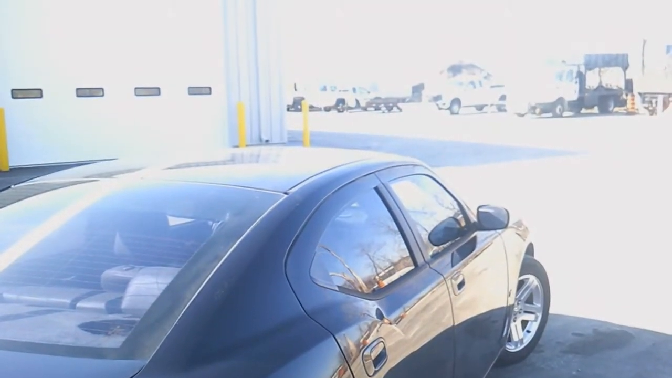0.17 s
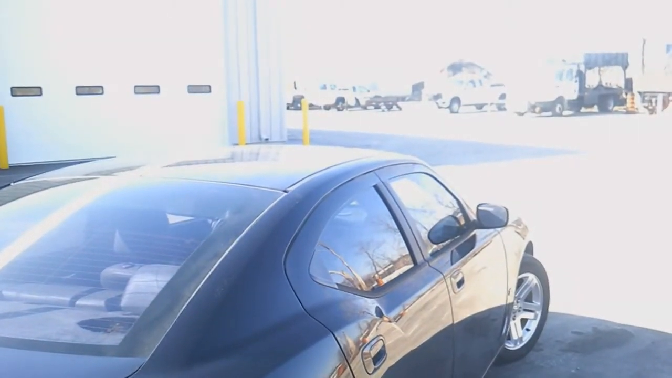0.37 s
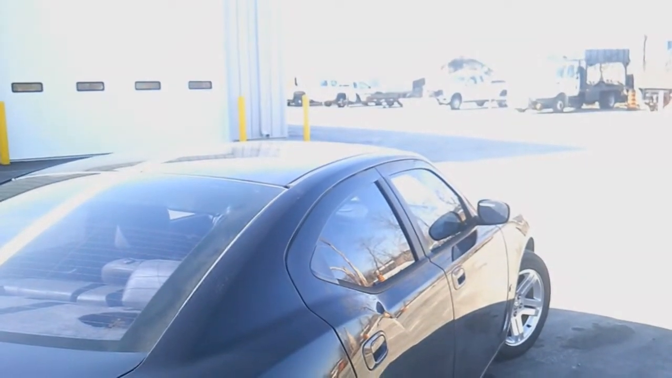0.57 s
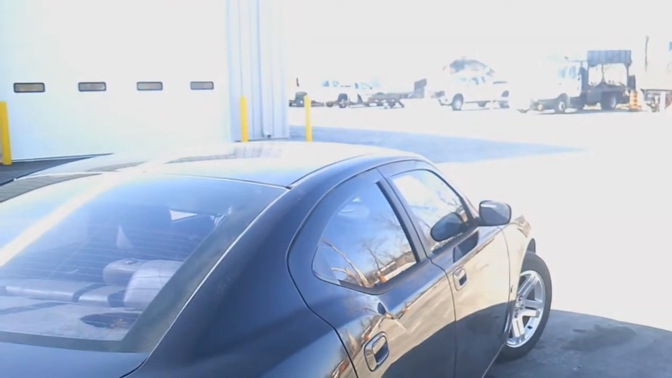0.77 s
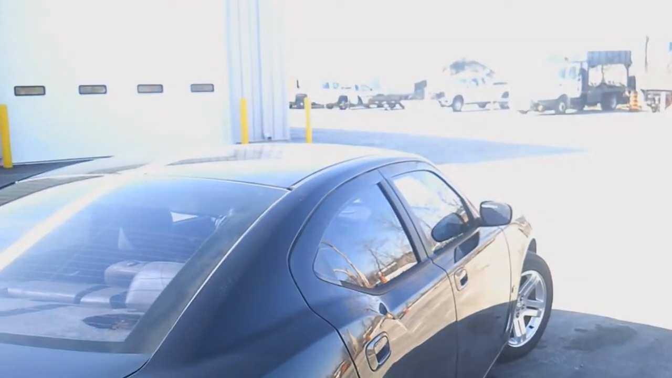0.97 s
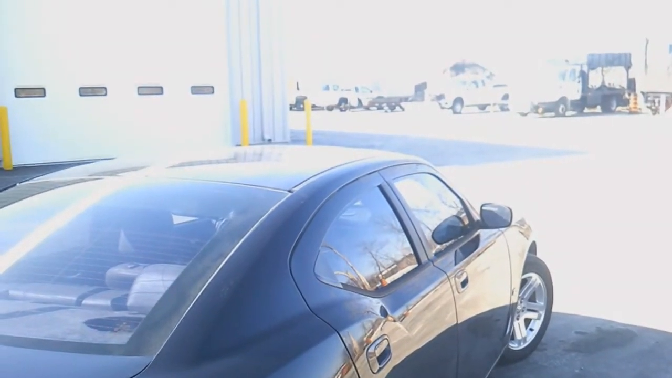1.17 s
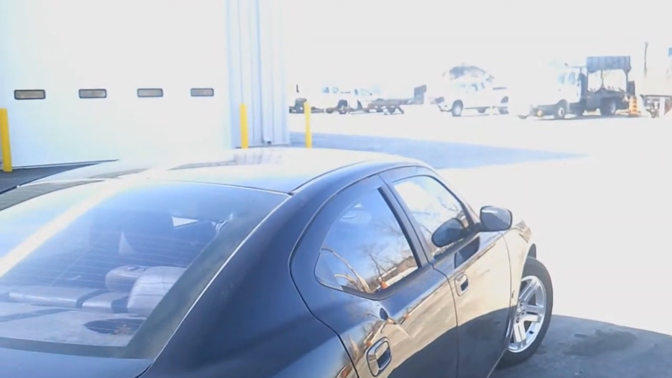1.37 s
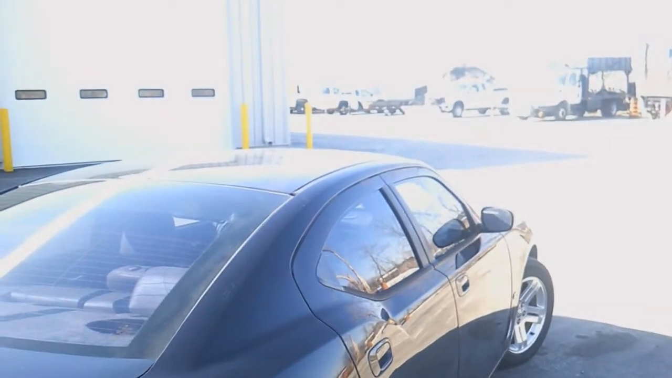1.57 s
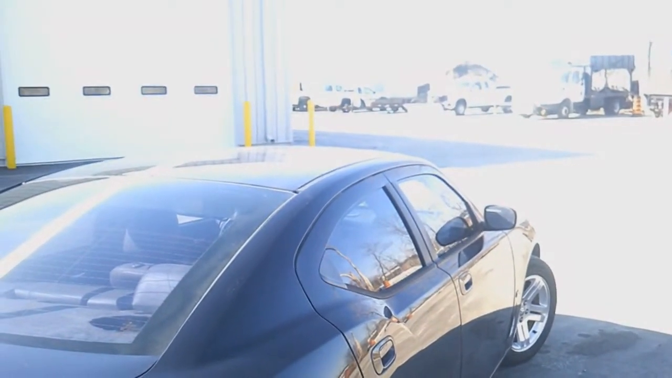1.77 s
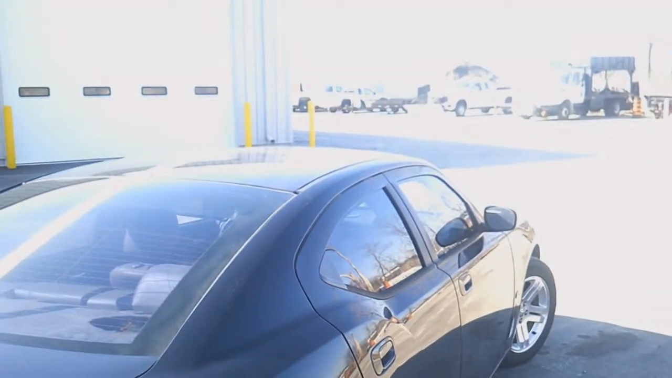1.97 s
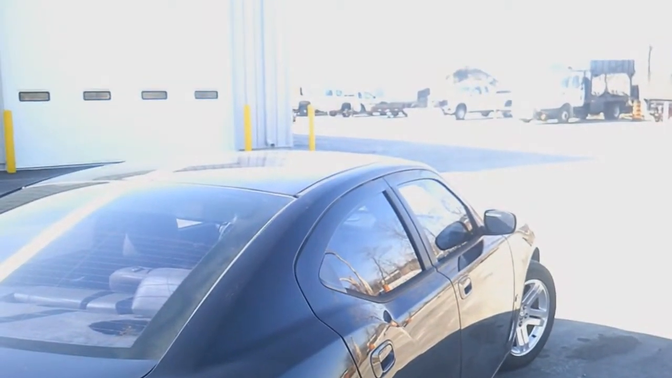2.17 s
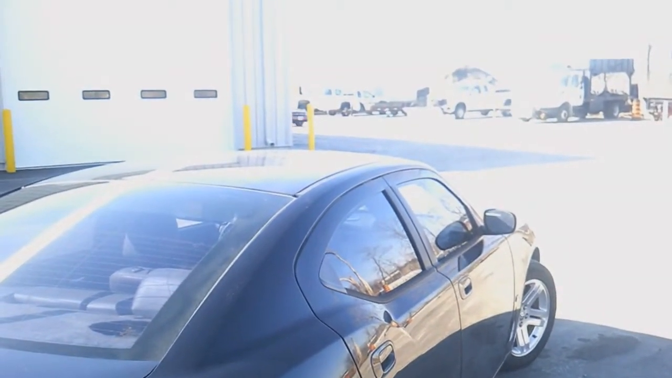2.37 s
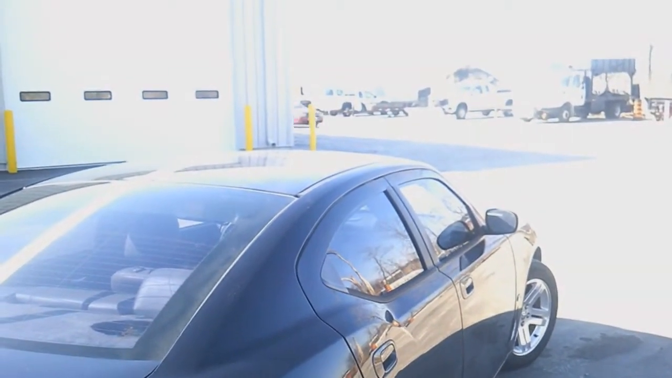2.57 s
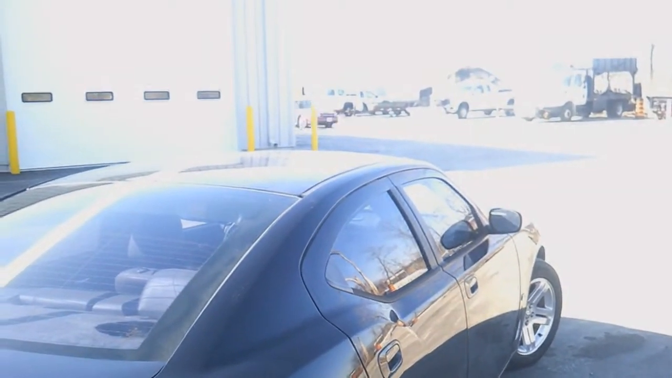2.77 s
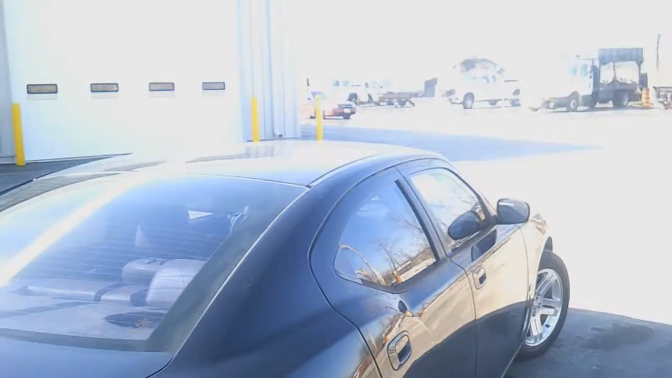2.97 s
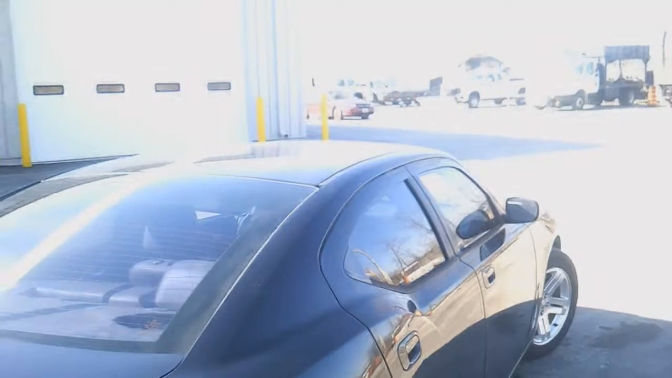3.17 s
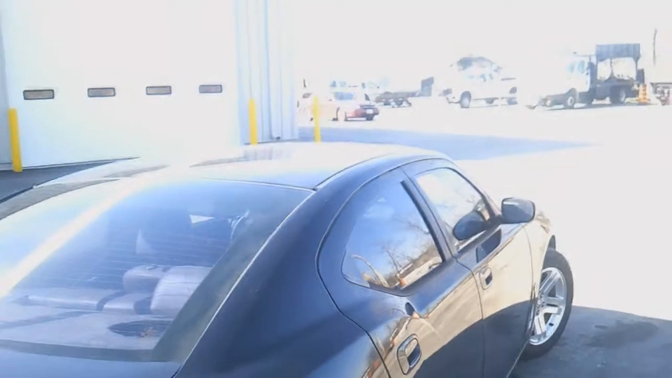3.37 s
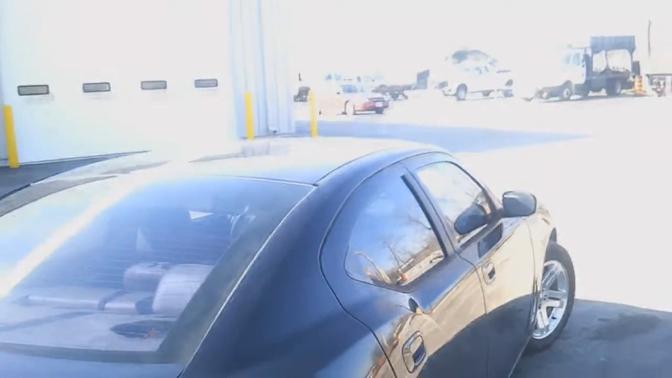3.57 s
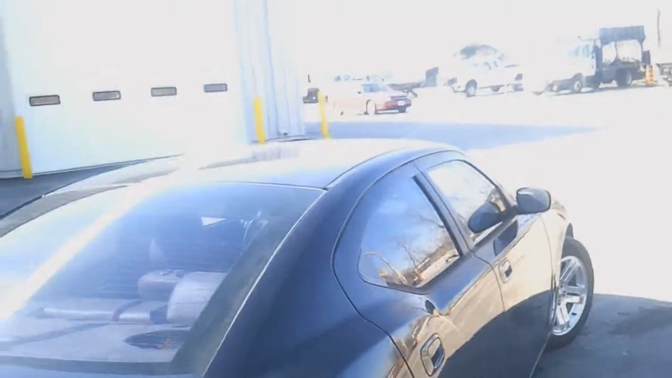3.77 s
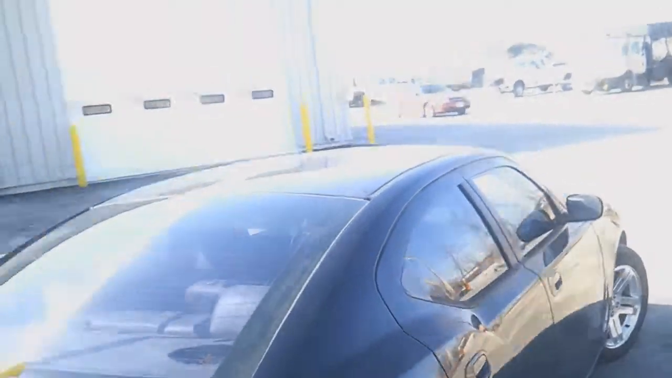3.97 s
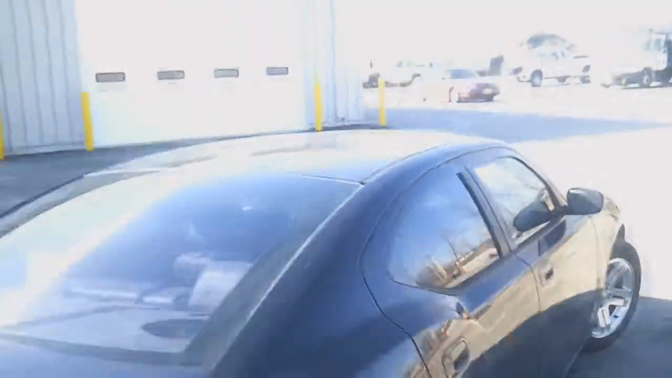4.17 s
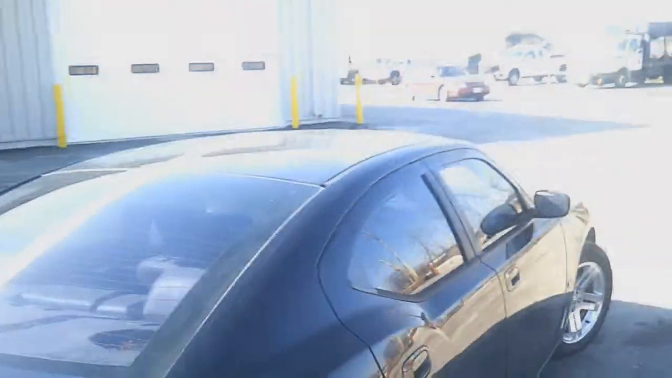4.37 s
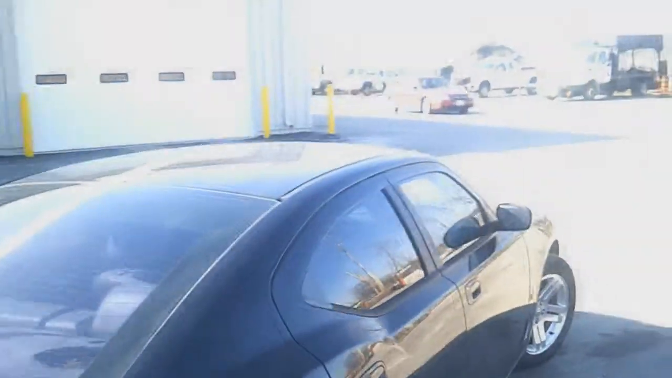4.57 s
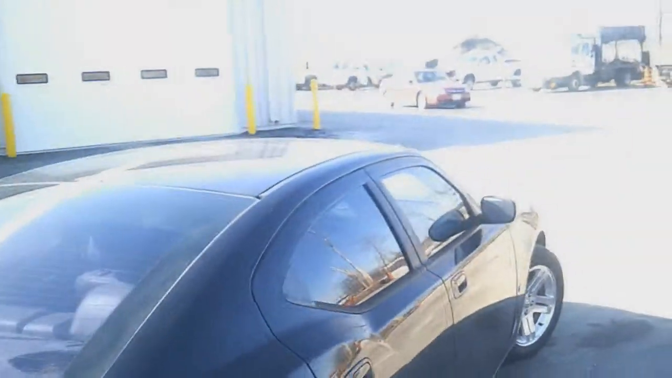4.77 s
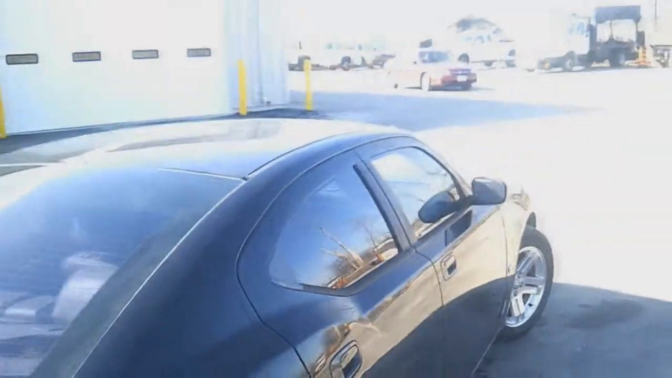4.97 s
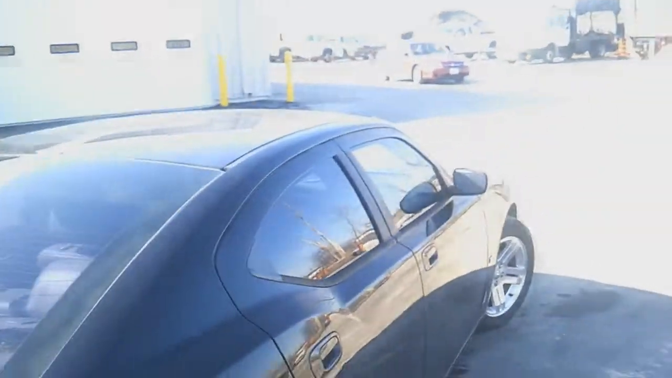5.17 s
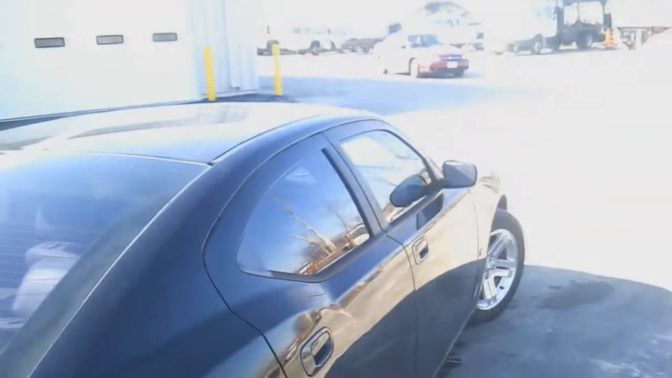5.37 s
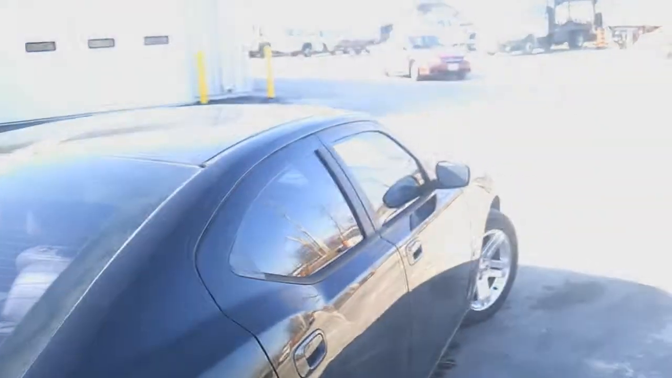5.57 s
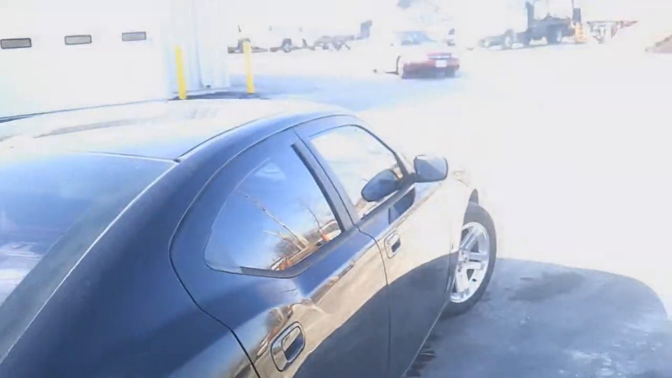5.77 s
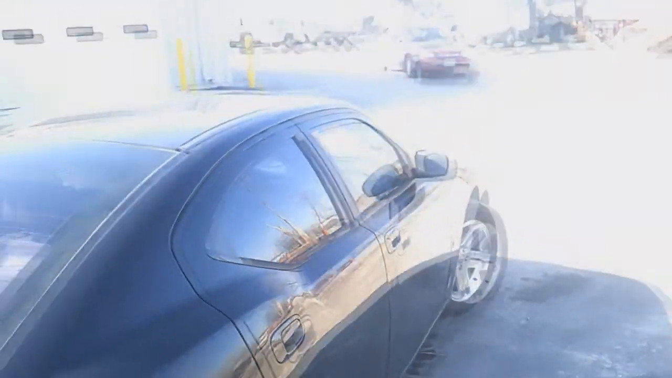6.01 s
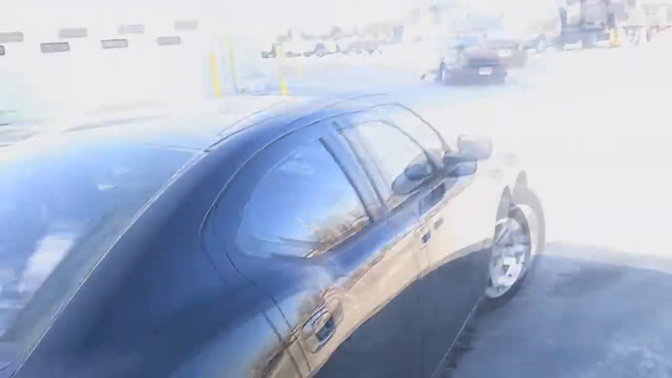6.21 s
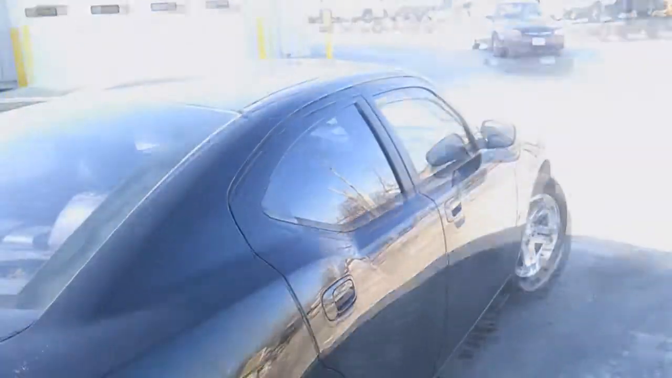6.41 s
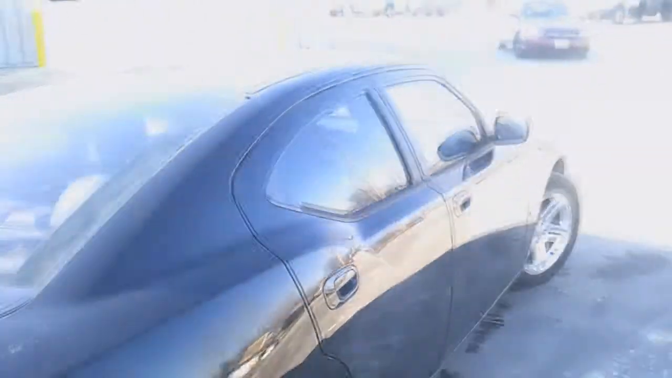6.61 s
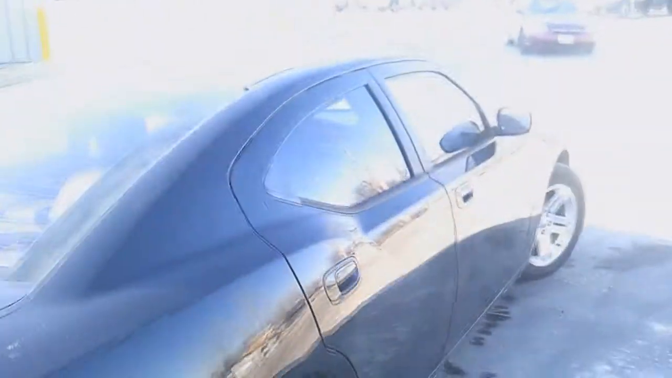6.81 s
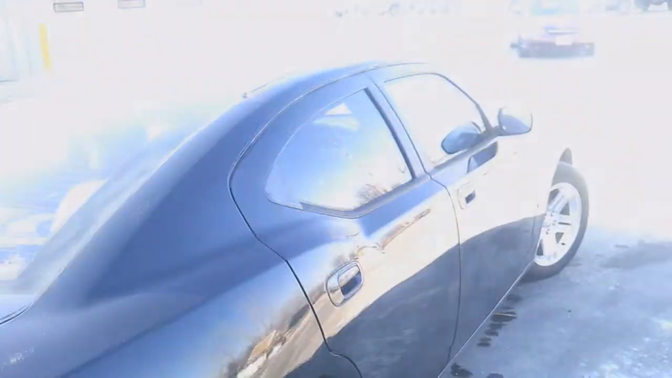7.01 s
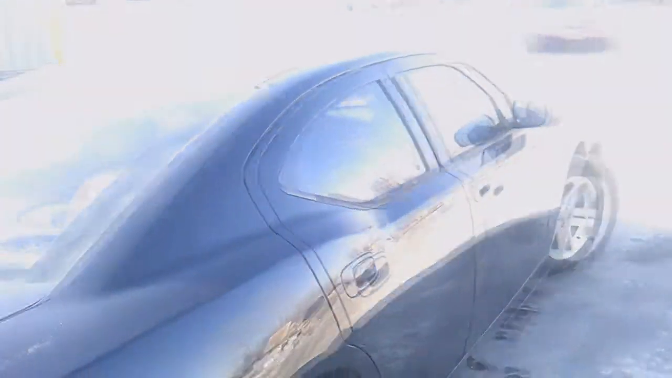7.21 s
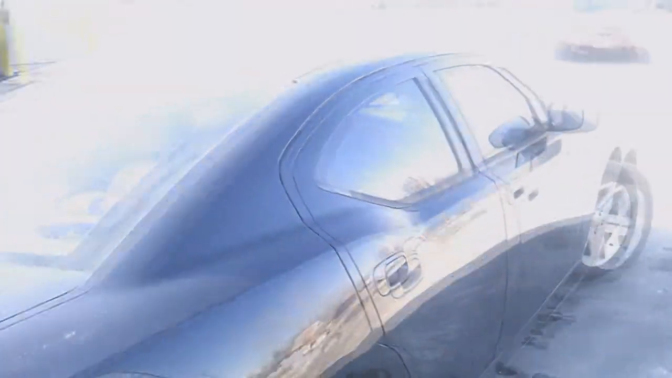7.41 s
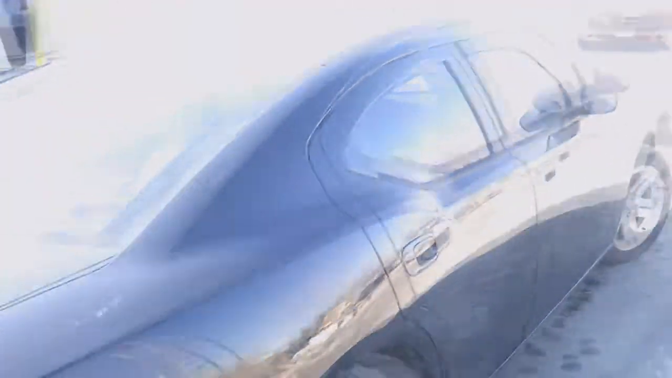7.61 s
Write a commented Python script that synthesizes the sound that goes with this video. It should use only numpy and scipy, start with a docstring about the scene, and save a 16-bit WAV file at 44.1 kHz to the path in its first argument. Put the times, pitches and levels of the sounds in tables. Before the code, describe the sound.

A car engine idles with a low hum as a car rolls slowly closer, while wind buffets the microphone.

```python
"""An open parking lot: a car engine idles fast, sagging and recovering, as a car rolls slowly closer.
The engine hums at multiples of its turning speed and booms when its exhaust pipe rings along.
Fans and belts whirr, tyres hiss and snap grit, and the other car drones briefly as it turns in.
Gusts buffet a small camera's microphone and, when strongest, make it pop.
The camera passes little above 3 kHz."""
import sys
import numpy as np
from scipy import signal
from scipy.fft import rfft, irfft, next_fast_len
from scipy.io import wavfile
from scipy.ndimage import uniform_filter1d

SR = 44100
rng = np.random.default_rng(int(sys.argv[2]) if len(sys.argv) > 2 else 0)


def transcribe(signal):
    """Save signal, clipped to [-1, 1], as a 16-bit WAV file at the path in sys.argv[1]."""
    frames = np.atleast_2d(signal).T
    limited = np.clip(frames, -1, 1)
    pcm = np.round(limited * 32767).astype(np.int16)
    wavfile.write(sys.argv[1], SR, pcm)


N = 337365
TIME = np.arange(N) / SR

# The engine's tones. Each row: multiple of the turning speed, relative level in dB, change under load in dB.
ENGINE_TONES = [(2, -10, 4.5), (3, -4.5, 0), (3.5, -9, 2.5), (4, 0.1, -1.5), (4.5, -22.5, 1.5),
                (5, -23, 1.5), (6, -19.5, -7), (6.5, -10.5, -5.5), (8, -20, 7.5), (10, -22, -3)]
# How fast the engine turns. Each row: time in seconds, turns per second.
ENGINE_SPEED = [(0, 31), (1, 30.67), (1.8, 30.38), (2.3, 29.43), (2.9, 29.04), (3.4, 29.39), (4, 29.47),
                (4.4, 30.17), (4.8, 30.78), (5.5, 30.96), (6.5, 30.57), (7, 30.42), (7.4, 29.78),
                (7.65, 30)]
# When the engine works harder. Each row: start in seconds, end in seconds.
LOAD_SPANS = [(2.13, 4.34), (7.12, 8.5)]
# The whine of a part the engine drives. Each row: time in seconds, pitch in Hz, level in dB.
ACCESSORY_WHINE = [(0, 2590, -65.5), (1.3, 2545, -70.5), (1.9, 2540, -61), (2.4, 2572, -58), (3, 2570, -62),
                   (3.4, 2595, -61.5), (4, 2600, -59), (4.35, 2580, -59), (4.6, 2535, -59),
                   (5.1, 2548, -66), (5.7, 2535, -61.5), (6.4, 2535, -65.5), (7.05, 2530, -70),
                   (7.3, 2520, -60), (7.65, 2550, -60)]
# Fans and belts. Each row: start and end in seconds, pitch in Hz, width in Hz, level in dB.
FAN_WHIRRS = [(0.4, 1.5, 1448, 16, -61), (1.5, 0.68, 1165, 22, -64), (0.3, 1.3, 1765, 25, -65),
              (0.4, 1.6, 2738, 24, -61.5), (0, 2.5, 580, 70, -62), (4.5, 8.4, 1380, 65, -58),
              (-1.5, 11, 2560, 170, -67), (7, 8.4, 2570, 140, -63)]
# Hiss of tyres and surroundings. Each row: frequency in Hz, relative dB with the car far, then near.
TYRE_COLOUR = [(58, 6, 9.5), (133, 14.5, 15.5), (167, -2, -1), (260, 5, 7.5), (363, 0.5, -1.5),
               (437, -1.5, -4.5), (515, 3, 2.5), (890, 1.5, 2), (1220, 0.5, -1), (1720, 0.5, 1),
               (2140, -1, 0), (2850, -4, -4), (4000, -2.5, -3.5)]
# The breeze on the microphone. Each row: time in seconds, then swell, rumble and flutter levels in dB.
BREEZE = [(0, -29, -40.5, -64.5), (1.4, -36.5, -41.5, -53.5), (2.2, -32, -43, -54.5),
          (3.05, -26, -41.5, -59), (3.55, -20, -40, -56), (4.4, -17.5, -39, -48), (4.8, -25.5, -44.5, -43),
          (5.4, -27, -40.5, -42), (5.9, -18, -39, -45), (6.45, -14, -40.5, -49.5), (6.85, -28.5, -35, -49),
          (7.25, -28.5, -33.5, -44), (7.65, -20.5, -36.5, -47)]
# Single shoves of wind. Each row: time and spread in seconds, thump in dB, thump in Hz, flutter in dB.
WIND_BUFFETS = [(.45, .035, -38, 40, -58), (0.806, 0.032, -36, 26, -54), (0.945, .07, -42, 77, -47),
                (1.83, 0.045, -37, 24, -57), (2.321, 0.036, -43, 25, -63), (2.602, .045, -33.5, 25, -63),
                (3.255, 0.054, -41.5, 28, -47), (3.508, 0.044, -36, 26, -61),
                (3.693, 0.042, -29.5, 20.3, -56.5), (3.85, 0.029, -23, 19.6, -65),
                (4.03, .04, -30.5, 21, -58), (4.275, 0.048, -28, 23, -46), (4.415, 0.024, -35, 52, -56),
                (4.54, 0.047, -29.5, 28, -49), (4.738, 0.018, -32.5, 55, -50), (4.82, .05, -40, 120, -43.5),
                (4.9, .03, -30.5, 33, -55), (5.13, .04, -23, 13.7, -58), (5.23, .05, -28, 24, -63),
                (5.585, 0.049, -20, 25, -33.5), (6.015, .04, -28, 16, -61), (6.55, .03, -34, 32, -37.5),
                (6.697, 0.021, -31, 48, -28.5), (6.755, 0.015, -39.5, 37, -35.5),
                (6.934, 0.015, -30.5, 77, -49), (7.18, 0.043, -33, 30, -51)]
# Grit on the asphalt. Each row: start in seconds, peak in dB, pitch in Hz, fade time in seconds.
GRIT_SNAPS = [(1.238, -43, 3750, 0.024), (2.717, -37.5, 2900, 0.008), (3.6, -46, 3750, 0.032),
              (3.892, -40, 4100, 0.012), (4.003, -39.5, 1500, 0.015), (6.251, -34, 1050, 0.005),
              (6.48, -34.5, 4100, 0.018), (6.523, -36, 1430, 0.007), (6.541, -38, 1370, 0.004)]
# Faint, bright scuffs. Each row: time in seconds, spread in seconds, level in dB.
BRIGHT_SCUFFS = [(1.255, 0.018, -51), (6.265, 0.071, -44.5), (6.488, 0.046, -40.5)]
# The other car's engine tones. Each row: multiple of its base pitch, relative level in dB.
FAR_CAR_TONES = [(2.5, -2), (3, 1.5), (3.5, -5.5), (5, -3.5), (6, 0.5), (8.5, -6.5), (9, -1), (10, -1),
                 (12, -5)]
# Pops of wind. Each row: time in seconds, level in dB, pitch in Hz.
WIND_POPS = [(4.695, -35, 360), (4.805, -30, 260), (5.003, -30, 245), (5.074, -36, 295),
             (5.085, -31.5, 330), (5.321, -33.5, 278), (5.399, -30, 376), (5.421, -26, 230),
             (5.526, -24, 440), (5.582, -36, 315), (5.607, -19, 159), (5.623, -24.5, 288),
             (5.643, -28.5, 296), (5.66, -23.5, 317), (5.72, -31, 260), (5.756, -36, 450),
             (5.802, -30, 240), (6.042, -41, 290), (6.136, -27, 530), (6.254, -31, 750), (6.541, -23, 380),
             (6.6825, -20, 201), (6.69, -23, 240), (6.695, -25, 400), (6.7087, -16.5, 310),
             (6.729, -24, 350), (6.875, -39, 380), (7.045, -33, 400)]
# What the camera lets through. Each row: frequency in Hz, gain in dB.
CAMERA_RESPONSE = [(2600, 0.5), (2850, -2.5), (3100, -9), (3400, -18), (3800, -25), (4400, -29.5),
                   (5000, -37), (6000, -39), (7200, -33.5), (8000, -38.5), (9000, -62)]
# The camera's own hiss. Each row: frequency in Hz, relative level in dB.
CAMERA_HISS = [(3000, -7), (5200, -13), (6300, -2.5), (7200, -0.5), (7900, -3), (8700, -21.5),
               (15000, -30.5)]


def undb(db):
    """Turn decibels into a number to multiply by."""
    return 10 ** (np.asarray(db) / 20)


def unit(x):
    """Scale a sound to an average strength (rms) of 1."""
    return x / np.sqrt(np.mean(x ** 2))


def curves(table):
    """Join timed rows with straight lines, giving one curve for each column after the time."""
    times, *columns = np.transpose(table)
    return [np.interp(TIME, times, column) for column in columns]


def colour(x, points):
    """Make some frequencies louder and others softer, following (Hz, dB) points."""
    hz, db = np.transpose(points)
    size = next_fast_len(N + SR // 2, True)
    bins_hz = np.maximum(np.fft.rfftfreq(size, 1 / SR), .5)
    gain = undb(np.interp(np.log(bins_hz), np.log(hz), db))
    padded = np.r_[x, np.linspace(x[-1], x[0], size - N)]
    return irfft(rfft(padded) * gain, size)[:N]


def noise(points):
    """Noise of strength 1, shaped by (Hz, dB) points."""
    return unit(colour(np.pad(rng.standard_normal(N - 2), 1), points))


def resonate(x, hz, width_hz):
    """Keep a narrow band around one pitch, so that it rings."""
    return signal.lfilter(*signal.iirpeak(hz, hz / width_hz, fs=SR), x)


def walk(rate):
    """A smooth random wobble of size about 1, with `rate` new values a second."""
    hold = int(SR / rate)
    steps = rng.standard_normal(2048)[np.arange(N) // hold % 2048]
    return 1.3 * uniform_filter1d(uniform_filter1d(steps, hold), hold)


def bell(at_s, spread_s):
    """A smooth rise and fall: 1 at the given time, about 0.6 one spread to either side."""
    return np.exp(-.5 * ((TIME - at_s) / spread_s) ** 2)


def rough_tone(hz, width_hz):
    """A tone of strength 1, its pitch smeared over the given width."""
    jitter = rng.standard_normal(N) + 1j * rng.standard_normal(N)
    drift = signal.lfilter([1], [1, -np.exp(-np.pi * width_hz / SR)], jitter)
    turns = np.cumsum(hz * np.ones(N)) / SR
    return unit((drift * np.exp(2j * np.pi * turns)).real)


def engine(idle_hz=31, idle_db=-42.5, sag_db_per_hz=3, load_ramp_s=0.63, stumble_rad=0.9):
    """Firings make a hum that weakens as the speed sags and gets lumpier under load."""
    turn_hz, = curves(ENGINE_SPEED)
    load = sum(np.clip(.5 + np.minimum(TIME - start, end - TIME) / load_ramp_s, 0, 1)
               for start, end in LOAD_SPANS)
    firing_db = idle_db - sag_db_per_hz * (idle_hz - turn_hz)
    angle = 2 * np.pi * np.cumsum(turn_hz * (1 + 0.003 * walk(12))) / SR
    lope_db = 0.7 * walk(11)  # all tones swell and dip together
    hum = 0
    for multiple, db, load_db in ENGINE_TONES:  # half steps: a four-stroke repeats every two turns
        lumps_db = (1.48 + 0.9 * load) * walk(16)
        stumble = stumble_rad * load * walk(28)  # uneven timing of the firings
        tone = np.sin(multiple * angle + stumble + 2 * np.pi * rng.random())
        hum += undb(db + load_db * load + lumps_db + lope_db) * tone
    return np.sqrt(2) * hum * undb(firing_db) + exhaust(turn_hz, angle, load)


def exhaust(turn_hz, angle, load, multiple=7, pipe_hz=204, width_hz=17, boom_db=-47.5, gas_db=-48):
    """The pipe booms as one engine tone sags onto its own pitch; flowing gas also makes it ring."""
    in_tune = 1 / np.hypot(1, (multiple * turn_hz - pipe_hz) / width_hz)
    # No two firings push the pipe alike, so timing and level waver.
    boom = in_tune * np.sin(multiple * angle + 0.28 * walk(45)) * undb(0.2 * walk(45))
    boom *= np.sqrt(2) * undb(boom_db + 6.5 * load)
    gas = resonate(rng.standard_normal(N), pipe_hz, 1.5 * width_hz)
    gas = unit(resonate(gas, pipe_hz, 1.5 * width_hz))
    return boom + gas * undb(gas_db - 6 * in_tune ** 2)  # the uneven ring gives way to the firm boom


def engine_bay(fade_s=0.51, wander=0.004):
    """A driven part whines, gliding a little; the whirrs of fans and belts wander, come and go."""
    whine_hz, whine_db = curves(ACCESSORY_WHINE)
    out = undb(whine_db) * rough_tone(whine_hz, width_hz=34)
    for start, end, hz, width_hz, db in FAN_WHIRRS:
        presence = np.clip(1 + np.minimum(TIME - start, end - TIME) / fade_s, 0, 1)
        out += undb(db) * presence * rough_tone(hz * (1 + wander * walk(2)), width_hz)
    return out


def tyres(far_db=-42, near_db=-39.5, approach_s=2.03, arrived_s=7.35, flicker_db=0.58):
    """Rolling tyres hiss over the open lot; the hiss grows and changes colour as the car nears."""
    closeness = np.clip((TIME - approach_s) / (arrived_s - approach_s), 0, 1)
    surge_db = 1.5 * bell(6.185, 0.18)  # a brief swell as the car pulls in
    level_db = far_db + (near_db - far_db) * closeness ** 2 + surge_db
    hz, far_colour, near_colour = np.transpose(TYRE_COLOUR)
    far = np.sqrt(1 - closeness) * noise(np.c_[hz, far_colour])
    near = np.sqrt(closeness) * noise(np.c_[hz, near_colour])
    return (far + near) * undb(level_db + flicker_db * walk(25))


def eddies(points):
    """Swirls of air make pressure swings of random length and even height."""
    swing = signal.hilbert(noise(points))
    return swing.real / np.abs(swing)


def wind(patchy_db=3, swell_uneven_db=1, rumble_uneven_db=1.5):
    """Big swirls sway the microphone's diaphragm, smaller ones rumble, the smallest flutter."""
    swell_gain, rumble_gain, flutter_gain = undb(curves(BREEZE))
    for at_s, spread_s, _, _, flutter_db in WIND_BUFFETS:  # each buffet adds a burst of flutter
        flutter_gain = np.hypot(flutter_gain, undb(flutter_db) * bell(at_s, spread_s))
    swell = eddies([(3, -26), (6.5, 1), (8, 0), (13, -17), (24, -37.5), (60, -90.5)])
    swell = colour(swell, [(2, -19.5), (5, -1), (14, 6.5), (22, -7.5), (45, -37.5), (100, -90.5)])
    rumble = eddies([(12, -18.5), (22, -1.5), (32, 1), (50, -10), (75, -14.5), (120, -23),
                     (250, -53.5), (800, -92)])
    rumble = colour(rumble, [(70, -4), (130, -1), (250, -17.5), (800, -52.5)])
    flutter = noise([(30, -14.5), (70, 0.5), (150, -2), (250, -9.5), (340, -12.5), (440, -16),
                     (650, -26), (1000, -42.5), (2000, -75.5)])
    flutter = unit(flutter * undb(patchy_db * walk(70)))
    swell = unit(swell * undb(swell_uneven_db * walk(22)))
    rumble = unit(rumble * undb(rumble_uneven_db * walk(24)))
    return swell * swell_gain + rumble * rumble_gain + flutter * flutter_gain


def tick(at_s=0.2183, peak_db=-45.5):
    """One tiny, dry tick from the camera."""
    spike = 1. * (np.arange(N) == int(at_s * SR))
    click = colour(spike, [(1000, 3), (3000, 5), (4500, -2), (6000, -2), (7500, -1), (8700, -35)])
    return undb(peak_db) * click / click.max()


def buffets(wander=0.12):
    """Each big swirl that hits the microphone's opening gives one round, low throb."""
    out = np.zeros(N)
    wobbly_time = np.cumsum(1 + wander * walk(30)) / SR
    for at_s, spread_s, db, hz, _ in WIND_BUFFETS:
        throb = np.sin(2 * np.pi * (hz * wobbly_time + rng.random()))
        out += np.sqrt(2) * undb(db) * bell(at_s, spread_s) * throb
    return out


def grit(relative_width=0.31):
    """Now and then a small stone cracks: a short, fading burst of noise around one pitch."""
    out = np.zeros(N)
    for start, db, hz, decay_s in GRIT_SNAPS:
        burst = rng.standard_normal(N) * (TIME >= start) * np.exp(-np.abs(TIME - start) / decay_s)
        ring = resonate(resonate(burst, hz, relative_width * hz), hz, relative_width * hz)
        out += undb(db) * ring / np.abs(ring).max()
    return out


def rustle(pull_in_db=-59.5, patchy_db=4):
    """A few bright, uneven scuffs, then a soft rustle as the car pulls in."""
    scuffs = sum(undb(db) * bell(at_s, spread_s) for at_s, spread_s, db in BRIGHT_SCUFFS)
    pull_in = undb(pull_in_db) * bell(8.1, 0.45)
    grain = noise([(1200, -14), (2500, -10.5), (4000, -6.5), (7500, -0.5), (9000, -21.5)])
    return (scuffs + pull_in) * unit(grain * undb(patchy_db * walk(120)))


def far_car(at_s=3.72, base_hz=171.3, sag_hz_per_s=13, wander=0.018, gain_db=-57.5, flicker_db=3):
    """The approaching car's engine drone swells, wavers and sinks as it clears a building's corner."""
    pitch_hz = (base_hz - sag_hz_per_s * (TIME - at_s)) * (1 + wander * walk(14))
    drone = sum(undb(db + flicker_db * walk(14)) * rough_tone(multiple * pitch_hz, width_hz=45)
                for multiple, db in FAR_CAR_TONES)
    return undb(gain_db) * bell(at_s, spread_s=0.28) * drone


def pops(spread_cycles=0.33, lopsided_rad=0.55):
    """A swirl breaking on the microphone's opening gives a dull kick: suction, then pressure."""
    out = np.zeros(N)
    for at_s, db, hz in WIND_POPS:
        near = np.abs(TIME - at_s) < .02
        cycles = (TIME[near] - at_s) * hz
        kick = np.sin(2 * np.pi * cycles + lopsided_rad * rng.standard_normal())
        out[near] += undb(db) * np.exp(-.5 * (cycles / spread_cycles) ** 2) * kick
    return out


def scene():
    """Engines, tyres and wind add up at one microphone."""
    cars = engine() + engine_bay() + far_car() + tyres() + grit() + rustle()
    return (cars + wind() + buffets() + pops())[None]


def record(dry, hiss_db=-81, top_hz=15300):
    """The camera dulls everything above 3 kHz and adds a faint hiss and a tick."""
    heard = colour(dry[0], CAMERA_RESPONSE) + undb(hiss_db) * noise(CAMERA_HISS) + tick()
    treble_cut = signal.ellip(8, .2, 70, top_hz, fs=SR, output="sos")
    return signal.sosfilt(treble_cut, heard)[None]


dry = scene()
out = record(dry)
transcribe(out)
```